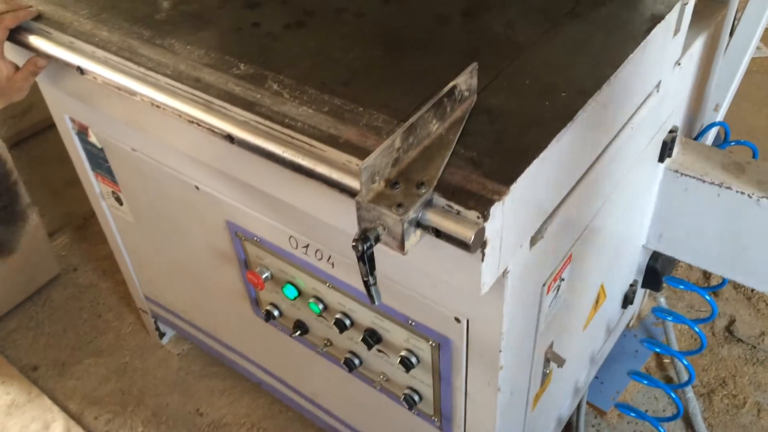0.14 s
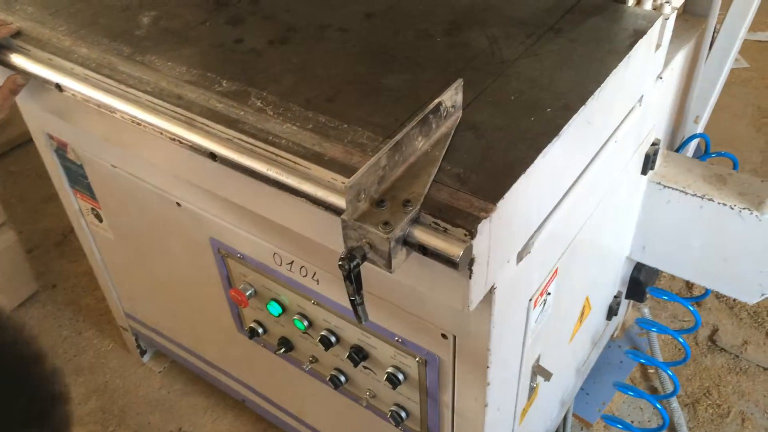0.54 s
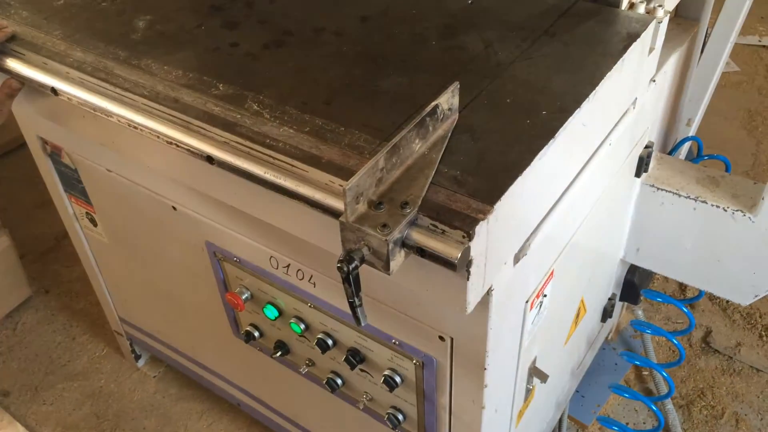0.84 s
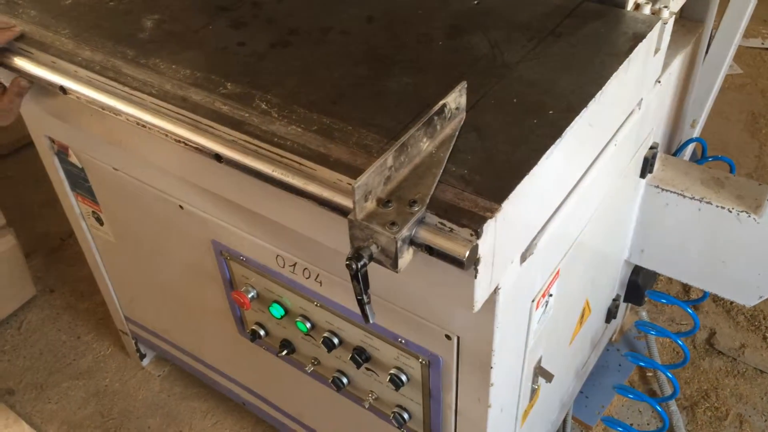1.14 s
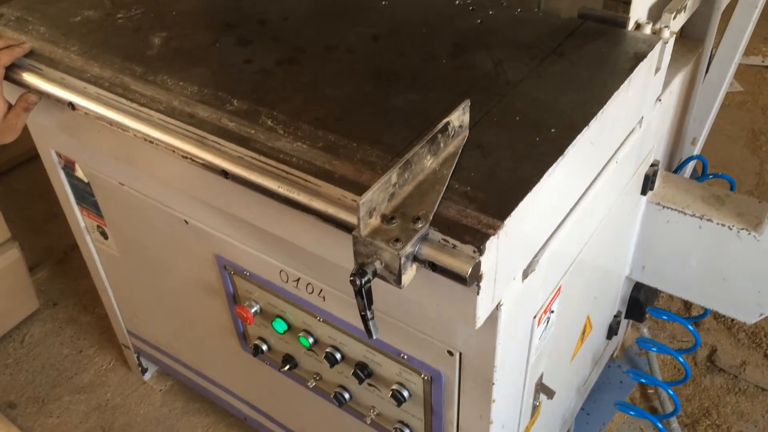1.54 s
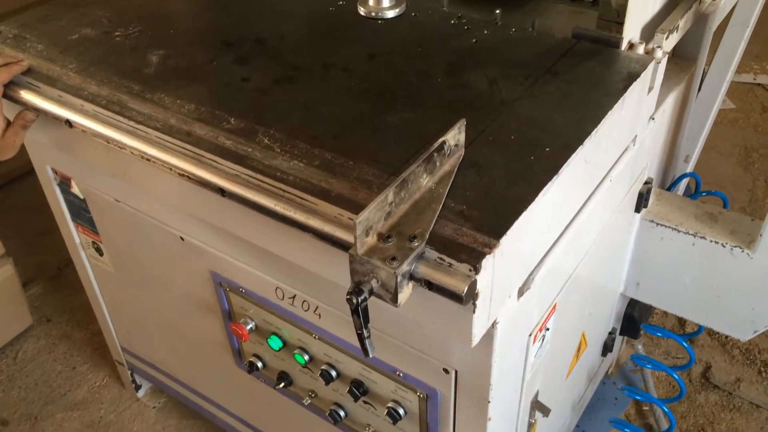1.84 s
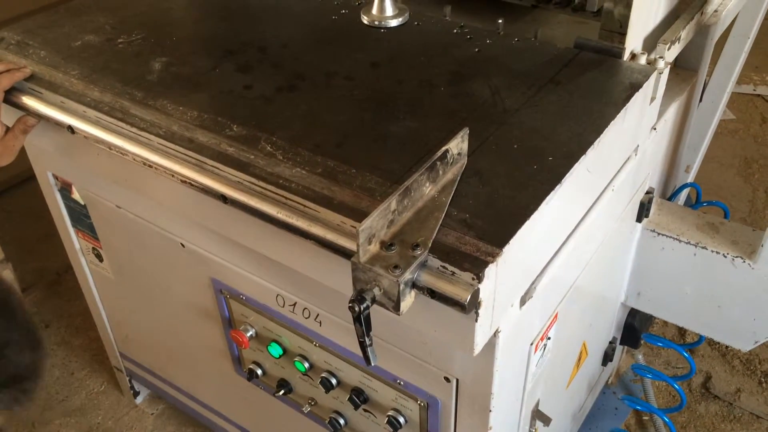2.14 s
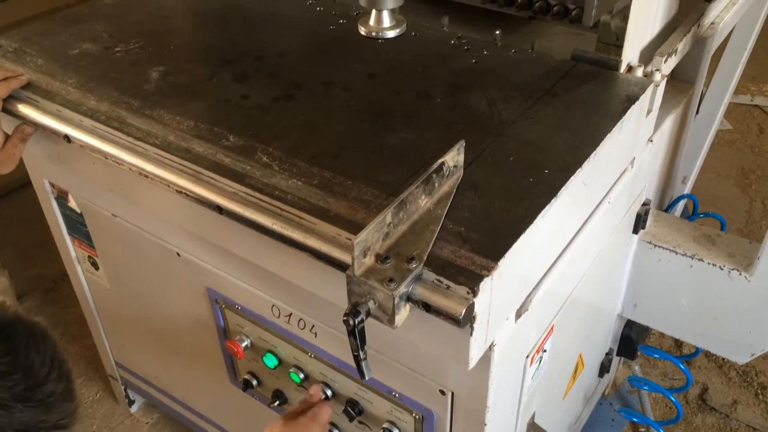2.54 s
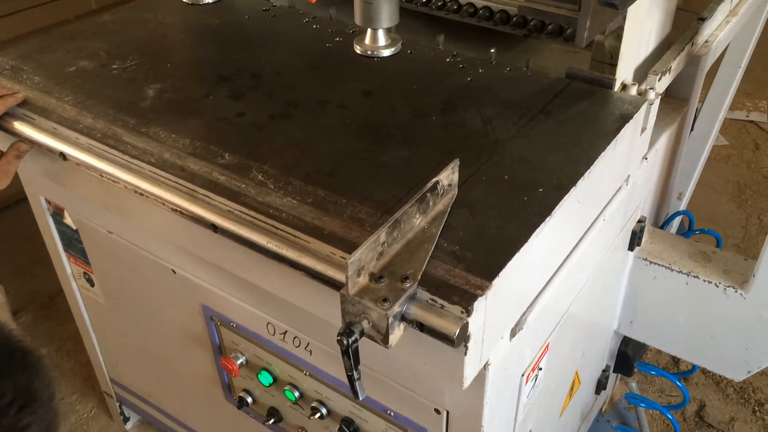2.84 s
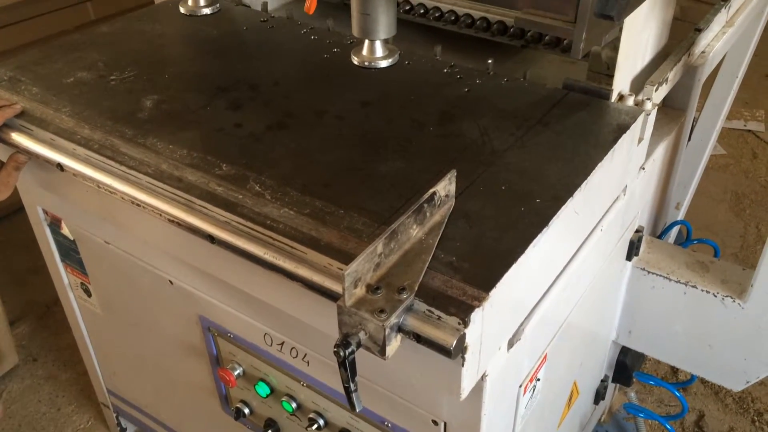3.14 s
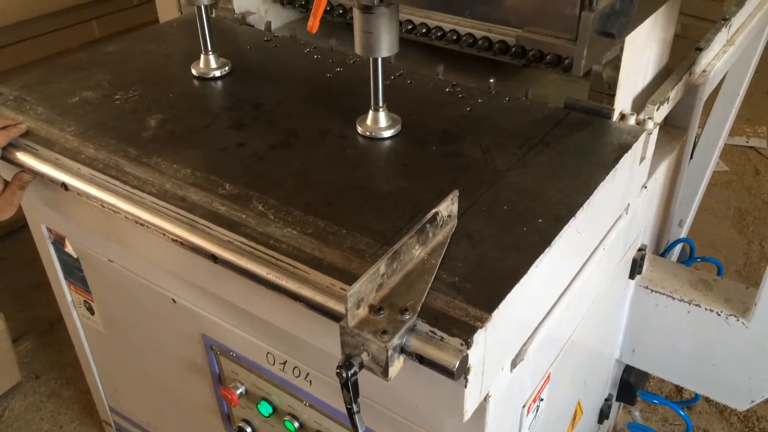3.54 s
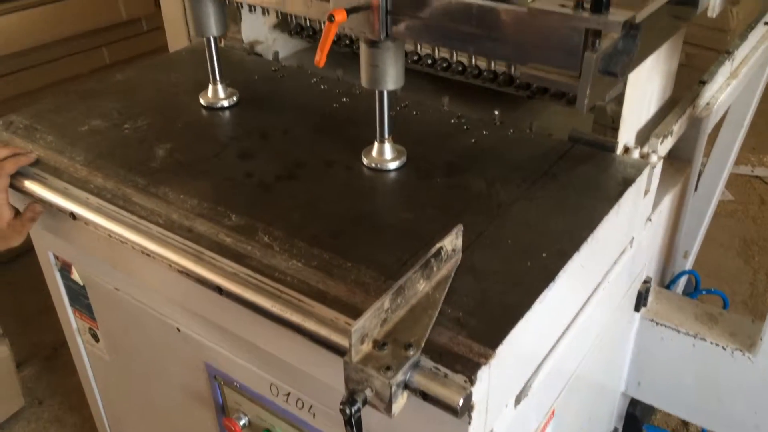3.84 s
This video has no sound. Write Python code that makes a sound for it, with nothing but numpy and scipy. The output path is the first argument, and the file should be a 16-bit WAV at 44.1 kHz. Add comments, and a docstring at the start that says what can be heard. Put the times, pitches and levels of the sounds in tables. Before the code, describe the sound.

Quiet leaking air and faint rubs beside a drilling machine, a few sharp switch clicks, then a sudden motor start with gear whine, metallic thud and swelling bright exhaust hiss, heard nearby in a room with short reverberation.

```python
"""Pneumatic drilling machine starting up

It idles with a leak of coloured noise and a wavering hum, under soft rubs. Panel switches snap as noise
bursts with a spring's ring; a contactor clacks as struck modes. A second clack starts the spindle motor: a noise
jolt, then gear whine and a rattle repeated each turn. Air blasts out, a cylinder thumps against its stop as ringing
cabinet modes, and the exhaust, a swelling jet of noise, hisses over the whine while the clamps come down."""
import sys
import numpy as np
from scipy import signal
from scipy.fft import rfft, irfft
from scipy.io import wavfile

SR = 44100
rng = np.random.default_rng(int(sys.argv[2]) if len(sys.argv) > 2 else 0)


def log_audio(samples):
    """Write samples as a 16-bit WAV file to the path given in sys.argv[1]."""
    # one column per channel
    frames = np.atleast_2d(samples).T
    # limit to full scale, then quantise
    limited = np.clip(frames, -1, 1)
    pcm = np.round(limited * 32767).astype(np.int16)
    wavfile.write(sys.argv[1], SR, pcm)


N = 176400  # samples: 4 s
T = np.arange(N) / SR  # s
HZ = np.maximum(np.fft.rfftfreq(N, 1 / SR), 1)
LOW_CUT_HZ, TOP_CUT_HZ = 36, 15300
ROOM_T60_S, ROOM_CUT_HZ = 0.24, 6500  # the workshop's short tail
PANEL_ECHO_DB = -16.5  # each short echo off a panel
PEAK_LIMIT = 0.7  # full scale = 1


def from_db(db):
    """Decibels to gain."""
    return 10 ** (np.asarray(db) / 20)


def noise(gain):
    """Noise with the given gain at each frequency, scaled to rms 1."""
    x = irfft(rfft(rng.standard_normal(N)) * gain, N)
    return x / np.sqrt(np.mean(x ** 2) + 1e-20)


def colour(points):
    """Gain at each frequency from (Hz, dB) points, falling away below the first."""
    hz, db = np.transpose(points)
    gain = from_db(np.interp(np.log(HZ), np.log(hz), db))
    return gain * np.minimum(HZ / hz[0], 1) ** 2


def bell(hz, width):
    """Resonance curve of height 1."""
    return 1 / (1 + (2 * (HZ - hz) / width) ** 2)


def envelope(start, t60, attack=0.0009, hold=0):
    """Linear attack, hold, exponential release; all times in seconds."""
    rise = np.clip((T - start) / attack, 0, 1)
    release_age = np.maximum(T - start - attack - hold, 0)
    return rise * from_db(-60 * release_age / t60)


def ring(modes, start):
    """Decaying modes struck at one moment with alternating signs, kept for one second."""
    t = np.maximum(T - start, 0)[:int((start + 1) * SR)]
    x = 0
    for k, (hz, db, t60) in enumerate(modes):
        x = x + (-1) ** k * from_db(db - 60 * t / t60) * np.sin(2 * np.pi * hz * t)
    return np.pad(x, (0, N - len(x)))


def dull(x, hz):
    """Gentle low-pass."""
    low_pass = signal.butter(2, min(hz, 0.45 * SR), fs=SR, output="sos")
    return signal.sosfilt(low_pass, x + 1e-18)


def tone(hz, width, waver):
    """A sine of rms about 1 whose pitch (rms width in Hz) and strength (rms waver) wander."""
    slow = bell(0, 38.3)
    turns = np.cumsum(hz + width * noise(slow)) / SR
    return np.sqrt(2) * np.sin(2 * np.pi * turns) * (1 + waver * noise(slow))


def in_room(x, wet_db):
    """Adds the workshop's diffuse tail: decaying dulled noise convolved with the sound."""
    tail = dull(rng.standard_normal(N), ROOM_CUT_HZ)[:SR]
    tail = tail * envelope(0.0035, ROOM_T60_S, attack=0.0039)[:SR]
    return x + from_db(wet_db) * signal.fftconvolve(x, tail / np.linalg.norm(tail))[:N]


def reflections(count=10):
    """Short echoes off the machine's panels comb the spectrum of a steady jet."""
    delays_s = rng.uniform(0.000987, 0.012, count)
    echoes = np.exp(-2j * np.pi * np.outer(delays_s, HZ)).sum(axis=0)
    return np.abs(1 + from_db(PANEL_ECHO_DB) * echoes)


# Spectrum of the leak: pitch_hz [Hz], relative level_db [dB per Hz]
LEAK_SPECTRUM = [(30, -30), (50, -7.5), (70, -11), (100, -8), (150, -11), (210, -8), (340, -6.5),
                 (430, -12.5), (700, -13.5), (1200, -3), (1750, -7.5), (2300, -5), (3400, -7), (4100, -9),
                 (4900, -7), (5700, -13.5), (7000, -15.5), (9400, -15.5), (10400, -20), (11500, -17.5),
                 (15500, -24)]
# Cabinet resonances colouring the leak: pitch_hz [Hz], width_hz [Hz], boost_db [dB]
LEAK_RESONANCES = [(1370, 124, 3), (1477, 30, 2), (2450, 45, 6), (2710, 44, 6.5), (3153, 67, 6.5),
                   (3434, 160, 6.5), (3690, 99, 7), (4700, 310, 4.5), (7330, 530, 3.5)]
# Steady hum and whine: pitch_hz [Hz, on average], level_db [dB, approximate rms]
HUM_TONES = [(100, -61), (339, -60.5), (1287, -53)]
LEAK_DB = -38.5  # rms


def idle():
    """Leaking air makes noise coloured by the cabinet; the hum is a few wavering tones."""
    boost_db = sum(db * bell(hz, width) for hz, width, db in LEAK_RESONANCES)
    leak_gain = colour(LEAK_SPECTRUM) * from_db(boost_db) * reflections()
    leak = from_db(LEAK_DB) * noise(leak_gain)
    hum = sum(from_db(db) * tone(hz, hz * 0.00618, waver=0.45) for hz, db in HUM_TONES)
    return leak + hum


# Soft dull rubs and bumps: start_s [s], length_s [s], level_db [dB, at the crest], pitch_hz [Hz], width_hz [Hz]
RUB_SWELLS = [(.58, .04, -40, 260, 35), (.62, .07, -46, 265, 45), (.55, .16, -52, 160, 60),
              (2.31, .14, -44, 175, 60), (2.32, .16, -48, 268, 40), (2.28, .2, -46.5, 690, 140),
              (2.86, .1, -54, 50, 25)]


def rubs():
    """Faint low swells of resonant noise."""
    out = 0
    for start, length, db, hz, width in RUB_SWELLS:
        swell = np.sin(np.pi * np.clip((T - start) / length, 0, 1))
        out = out + from_db(db) * noise(bell(hz, width)) * swell
    return out


# Contacts of the panel switches: start_s [s], level_db [dB, before low-pass], brightness_hz [Hz, low-pass cutoff]
SWITCH_CONTACTS = [(1.513, -23, 12000), (1.5157, -14, 12300), (1.5182, -19, 4500), (1.994, -25.5, 13050),
                   (1.9971, -20.5, 5030), (2.6974, -30, 15000)]
# Spectrum of a snap: pitch_hz [Hz], relative level_db [dB per Hz]
SNAP_SPECTRUM = [(150, -17), (300, -6), (470, 1), (700, -13.5), (1000, 4), (1350, -4.5), (2400, 2.5),
                 (3700, -2.5), (5500, -0.5), (7500, -3), (8900, 1.5), (10000, -11.5), (15000, -7.5)]
# A switch spring is let go: start_s [s], level_db [dB, added to each mode]
SPRING_RELEASES = [(1.517, -14), (1.9972, -32)]
# Modes of the spring: pitch_hz [Hz], relative level_db [dB], t60_s [s]
SPRING_MODES = [(5260, -1.5, 0.077), (4860, -13, .03), (9100, -8, .02), (963, -7.5, .04), (2330, -14, .03)]
SNAP_T60_S = 0.039
SWITCH_ROOM_DB, SPRING_ROOM_DB = -13, -20


def switches():
    """Each contact is a short crack of noise, and the spring rings in its own modes."""
    snaps = 0
    for start, db, hz in SWITCH_CONTACTS:
        crack = from_db(db) * noise(colour(SNAP_SPECTRUM)) * envelope(start, SNAP_T60_S)
        snaps = snaps + dull(crack, hz)
    springs = sum(from_db(db) * ring(SPRING_MODES, start) for start, db in SPRING_RELEASES)
    return in_room(snaps, SWITCH_ROOM_DB) + in_room(springs, SPRING_ROOM_DB)


# Contactor strokes: start_s [s], clack_db [dB, added to each mode], brightness_hz [Hz, low-pass cutoff],
# crack_db [dB], crack_t60_s [s]
CONTACTOR_STROKES = [(1.8025, -6, 7000, -30, 0.015), (3.3918, -6, 2580, -30, .085)]
# Modes of the armature: pitch_hz [Hz], relative level_db [dB], t60_s [s]
ARMATURE_MODES = [(967, -13.5, .016), (1535, -4.5, 0.017), (1860, 1, 0.017), (2090, -4, 0.009),
                  (2910, -9.5, 0.016), (4000, -5.5, 0.014), (4750, -14, 0.0067), (6500, -14, 0.0019)]
ECHO_S, ECHO_DB, CONTACTOR_ROOM_DB = 0.0075, -14.5, -15


def contactors():
    """The armature slams home with a crack and rings; a near surface throws the clack back."""
    out = 0
    for start, db, hz, crack_db, crack_t60 in CONTACTOR_STROKES:
        crack = from_db(crack_db) * noise(bell(4000, 14000)) * envelope(start, crack_t60)
        echo = from_db(ECHO_DB) * ring(ARMATURE_MODES, start + ECHO_S)
        clack = from_db(db) * dull(ring(ARMATURE_MODES, start) + echo, hz)
        out = out + crack + clack
    return in_room(out, CONTACTOR_ROOM_DB)


MOTOR_HZ = 49.702  # shaft turns per second at full speed
# Tooth rattle, alike on every turn: pitch_hz [Hz], relative level_db [dB per Hz]
RATTLE_SPECTRUM = [(280, -20), (700, -13), (1100, -3), (1600, -0.5), (2100, 4.5), (2500, 2.5), (3150, 2),
                   (3600, -2), (4500, -4), (7000, -7), (9000, -19)]
RATTLE_UNEVEN_DB = 1.5  # random spread from harmonic to harmonic


def one_turn(size=4096):
    """The uneven teeth of the gears, as the sound of one turn of the shaft; rms 1."""
    hz = np.arange(size // 2 + 1) * MOTOR_HZ
    unevenness = from_db(RATTLE_UNEVEN_DB * rng.standard_normal(len(hz)))
    gain = np.interp(hz, HZ, colour(RATTLE_SPECTRUM)) * (hz < TOP_CUT_HZ) * unevenness
    turn = irfft(gain * np.exp(2j * np.pi * rng.random(len(hz))))
    return turn / turn.std()


# Gear whine: shaft_multiple [times the shaft rate], level_db [dB rms, at full level]
WHINE_TONES = [(41, -36), (42, -42.5), (44, -51), (57, -42), (58, -41.5), (60, -47), (62, -41), (63, -29),
               (65, -38), (89, -51)]
# Spectrum of the starting jolt: pitch_hz [Hz], relative level_db [dB per Hz]
JOLT_SPECTRUM = [(45, -10), (75, -8), (130, -1), (200, -11), (330, -2.5), (500, -0.5), (1000, -10),
                 (1800, -4.5), (2400, -2), (3200, -3.5), (3800, -10), (8000, -14), (15000, -20)]
# The frame booms under the motor's starting torque: pitch_hz [Hz], level_db [dB], t60_s [s]
FRAME_MODES = [(111, -26.5, 0.26), (141, -24, .2), (332, -25.5, 0.18)]
JOLT_S, JOLT_ATTACK_S, JOLT_HOLD_S, JOLT_T60_S, JOLT_DB = 3.401, 0.014, 0.018, 0.62, -21
FRAME_S = 3.407
SPIN_UP_S, GEAR_RISE_S, WHINE_RISE_S = 0.03, 0.051, 0.12  # time constants
SPEED_WANDER = 0.00039  # rms, as a fraction of the speed
RATTLE_DB, HOUSING_DB = -31.5, -33  # at full level


def spindle():
    """The motor jolts and is soon at speed; its gears whine and rattle in step with the shaft."""
    age = np.maximum(T - JOLT_S, 0)
    wander = 1 + SPEED_WANDER * noise(bell(0, 20))
    turns = np.cumsum(MOTOR_HZ * (1 - np.exp(-age / SPIN_UP_S)) * wander) / SR
    teeth = one_turn()
    rattle = from_db(RATTLE_DB) * np.interp(turns % 1, np.linspace(0, 1, len(teeth)), teeth)
    whine = 0
    for multiple, db in WHINE_TONES:
        phase = 2 * np.pi * (round(multiple) * turns + rng.random())
        whine = whine + from_db(db) * np.sqrt(2) * np.sin(phase)
    jolt_shape = envelope(JOLT_S, JOLT_T60_S, JOLT_ATTACK_S, JOLT_HOLD_S)
    jolt = from_db(JOLT_DB) * noise(colour(JOLT_SPECTRUM)) * jolt_shape
    # the gear housing resounds at two resonances
    housing = from_db(HOUSING_DB) * noise(bell(3070, 530) + 0.6 * bell(2120, 180))
    gear_level = 1 - np.exp(-age / GEAR_RISE_S)
    whine_level = (1 - np.exp(-age / WHINE_RISE_S)) ** 3
    return jolt + ring(FRAME_MODES, FRAME_S) + gear_level * (rattle + housing) + whine_level * whine


# The cylinder hits its stop and rebounds: start_s [s], level_db [dB, added to each cabinet mode]
STOP_HITS = [(3.5046, -18.5), (3.5159, -33.5), (3.5435, -33.5)]
# Modes of the steel cabinet: pitch_hz [Hz], relative level_db [dB], t60_s [s]
CABINET_MODES = [(169, -14.5, 0.51), (248, -9, 0.42), (280.7, -8, 0.44), (395, -1.5, 0.53), (471, -3, .2),
                 (500, -7, .35), (556, -3, .35), (705, 2.5, 0.25), (899, -7, 0.53), (1068, -8, 0.78),
                 (1320, -8, 0.58), (1320, -2, 0.4), (1490, -5, 0.42), (1860, -7.5, 0.43),
                 (1846, -6.5, 0.21)]
# Dense panel ring: pitch_hz [Hz], relative level_db [dB per Hz]
THUD_SPECTRUM = [(70, -28), (115, -10), (240, -3.5), (560, 0), (780, -2), (1050, 1.5), (1350, 0),
                 (1750, -3), (2050, -14), (4000, -27)]
# Loose metal parts tick: start_s [s], level_db [dB, before the envelope], pitch_hz [Hz]
LOOSE_TICKS = [(3.4105, -28, 4540), (3.4217, -16.5, 5000), (3.4235, -25, 9000), (3.544, -20, 6900),
               (3.565, -22, 5430)]
THUD_DB, THUD_HOLD_S, THUD_T60_S = -15, 0.016, 0.039
THUD_TAIL_DB, THUD_TAIL_T60_S = -19, 0.53
TICK_T60_S = 0.034


def cylinder():
    """The end stop gives a hard thud that lingers in the cabinet and the room; loose parts tick."""
    modes = sum(from_db(db) * ring(CABINET_MODES, start) for start, db in STOP_HITS)
    first_hit = STOP_HITS[0][0]
    thud_shape = envelope(first_hit, THUD_T60_S, hold=THUD_HOLD_S)
    thud = from_db(THUD_DB) * noise(colour(THUD_SPECTRUM)) * thud_shape
    tail_shape = envelope(first_hit, THUD_TAIL_T60_S, attack=0.03)
    tail = from_db(THUD_TAIL_DB) * noise(colour(THUD_SPECTRUM)) * tail_shape
    ticks = 0
    for start, db, hz in LOOSE_TICKS:
        ticks = ticks + from_db(db) * noise(bell(hz, 0.66 * hz)) * envelope(start, TICK_T60_S)
    return modes + thud + tail + ticks


# First blast, as one cylinder chamber vents: pitch_hz [Hz], relative level_db [dB per Hz]
BLAST_SPECTRUM = [(200, -12), (1000, 1), (2200, -13), (3150, 8), (3800, -9.5), (6000, -0.5), (8500, 2),
                  (11000, 1.5), (12700, -3), (14300, 3.5), (15500, -6.5)]
# Exhaust jet: pitch_hz [Hz], relative level_db [dB per Hz]
EXHAUST_SPECTRUM = [(200, -30), (400, -8.5), (700, -8), (1100, -10), (2000, -5), (2900, -4.5), (3800, -3.5),
                    (5300, -2.5), (6200, -1.5), (7050, 1.5), (7900, -0.5), (8900, 1), (9300, -1),
                    (9750, 2.5), (10300, 0), (12400, -1), (13200, 1.5), (14300, 0), (15000, 0.5)]
BLAST_S, BLAST_ATTACK_S, BLAST_HOLD_S, BLAST_T60_S, BLAST_DB = 3.43, 0.02, 0.05, 0.11, -19
EXHAUST_S, EXHAUST_DB = 3.492, -21  # level at full flow
SWELL_S, SWELL_DB = 0.16, 15.5  # time constant; starting depth below full flow


def exhaust():
    """One chamber vents in a short bright blast; the jet then swells as the clamps gather speed."""
    blast_shape = envelope(BLAST_S, BLAST_T60_S, BLAST_ATTACK_S, BLAST_HOLD_S)
    blast = from_db(BLAST_DB) * noise(colour(BLAST_SPECTRUM)) * blast_shape
    age = np.maximum(T - EXHAUST_S, 0)
    flow = from_db(EXHAUST_DB - SWELL_DB * np.exp(-age / SWELL_S))
    jet = flow * noise(colour(EXHAUST_SPECTRUM) * reflections())
    fade_in = np.minimum(age / 0.013, 1)
    return blast + fade_in * jet


def scene():
    """All sources at one microphone."""
    background = idle() + rubs()
    controls = switches() + contactors()
    machine = spindle() + cylinder() + exhaust()
    return (background + controls + machine)[None]


def record(dry):
    """The highest peaks are rounded; the deepest bass and the top are cut."""
    rounded = dry / (1 + (dry / PEAK_LIMIT) ** 6) ** (1 / 6)
    bass_cut = signal.butter(4, LOW_CUT_HZ, "high", fs=SR, output="sos")
    top_cut = signal.ellip(12, 0.1, 80, TOP_CUT_HZ, fs=SR, output="sos")
    return signal.sosfilt(top_cut, signal.sosfilt(bass_cut, rounded))


dry = scene()
out = record(dry)
log_audio(out)
```